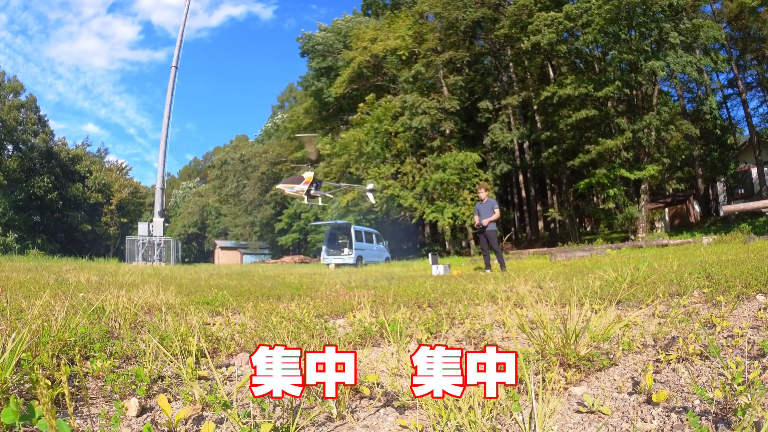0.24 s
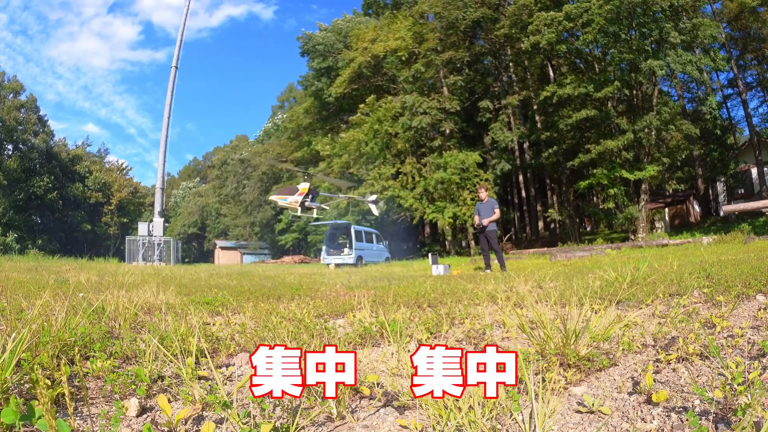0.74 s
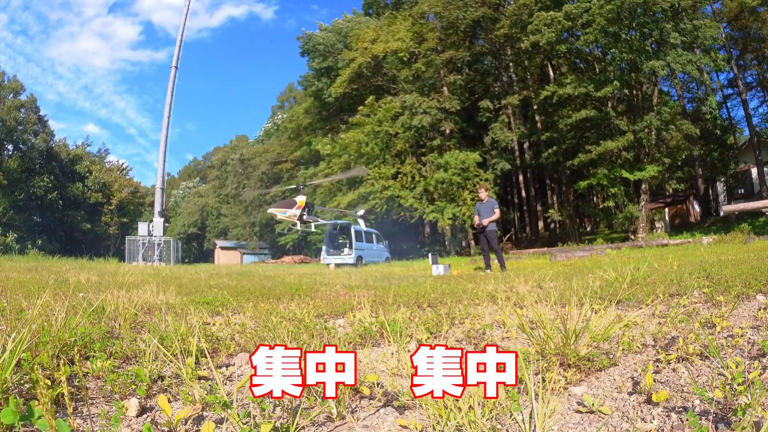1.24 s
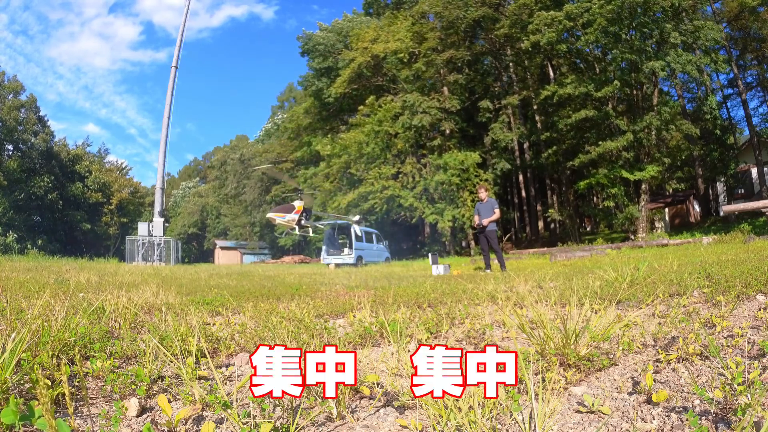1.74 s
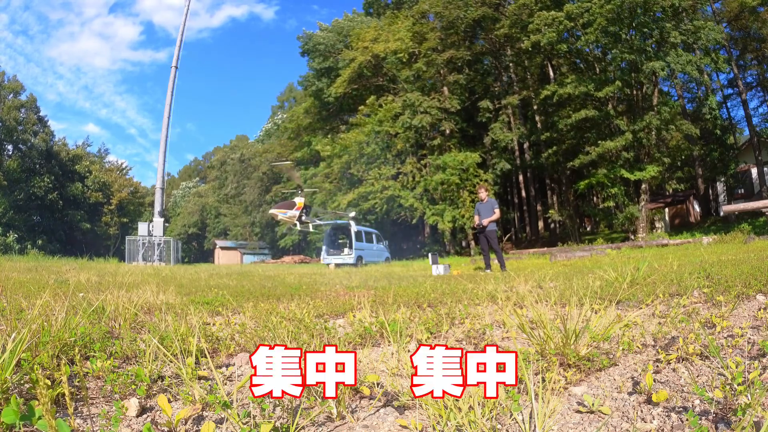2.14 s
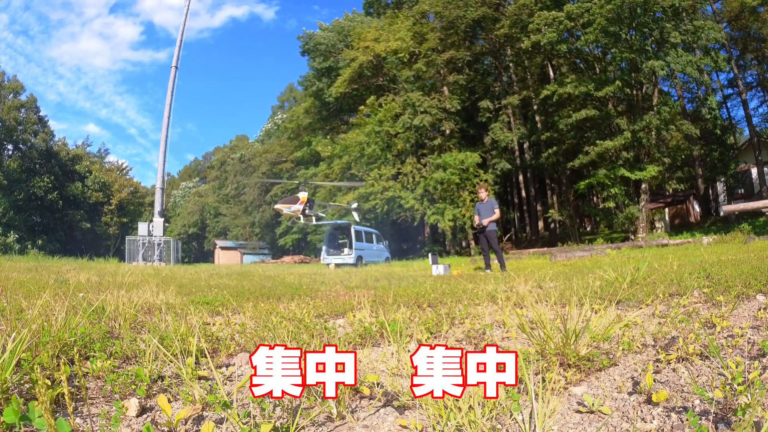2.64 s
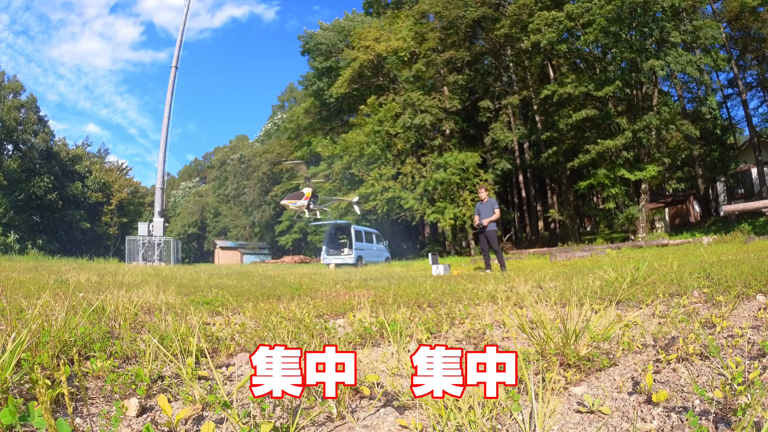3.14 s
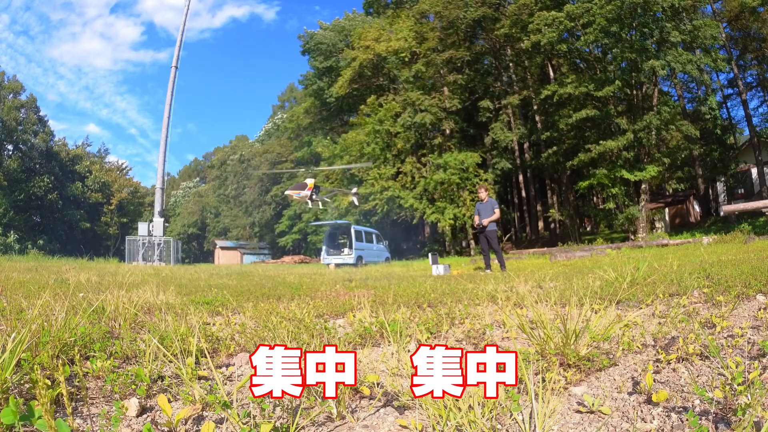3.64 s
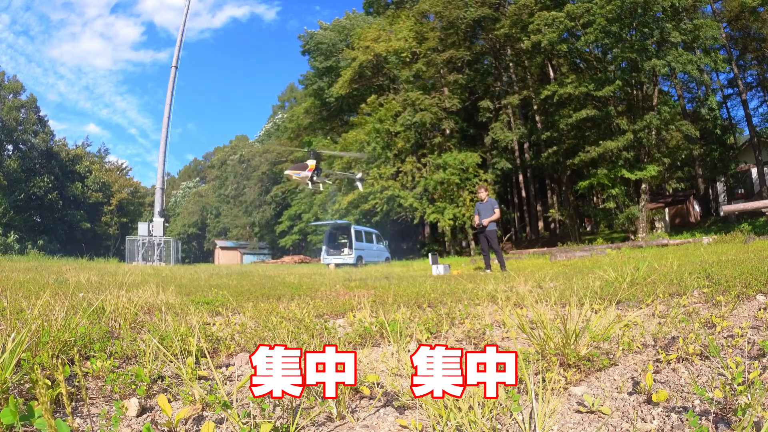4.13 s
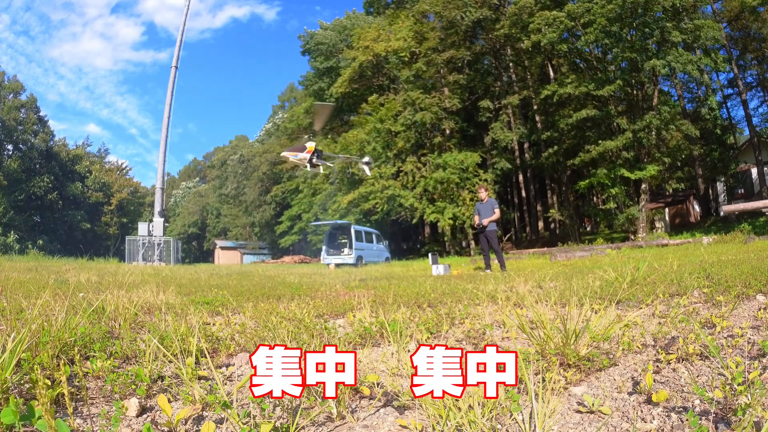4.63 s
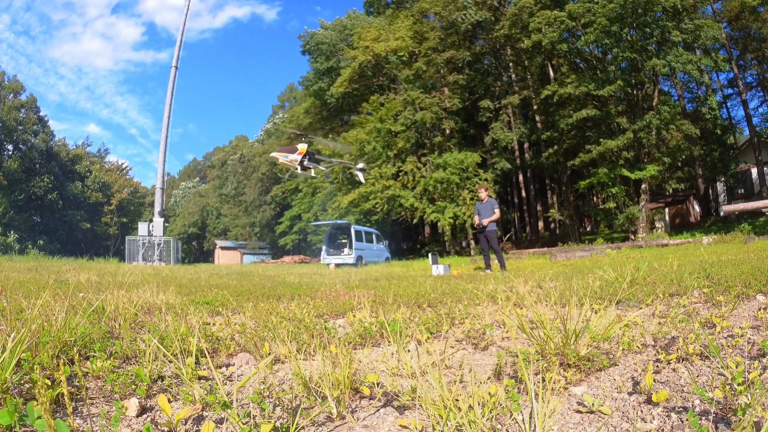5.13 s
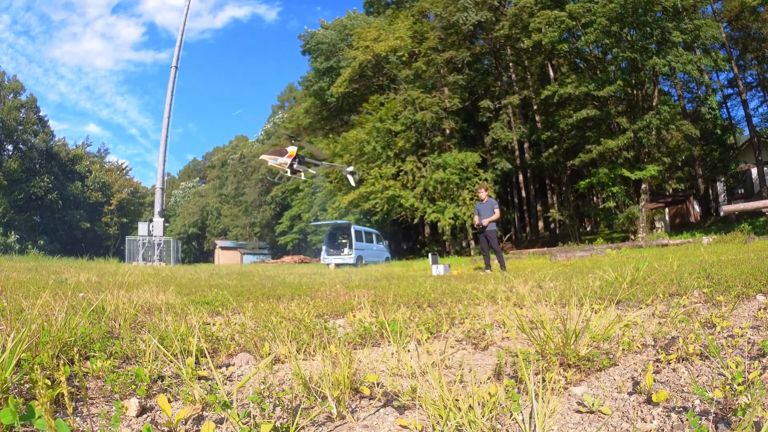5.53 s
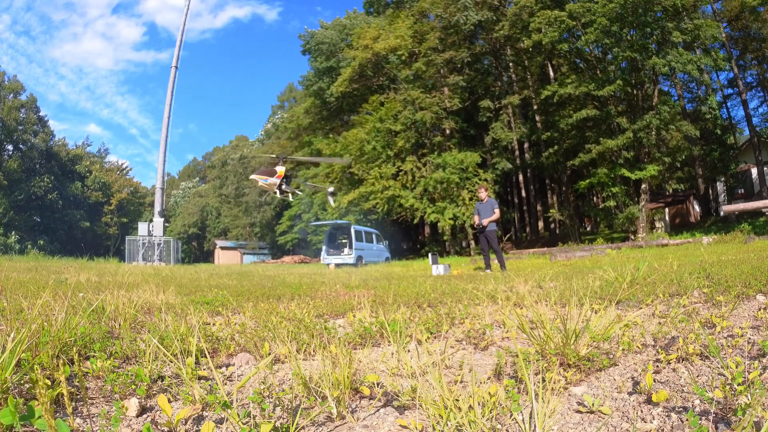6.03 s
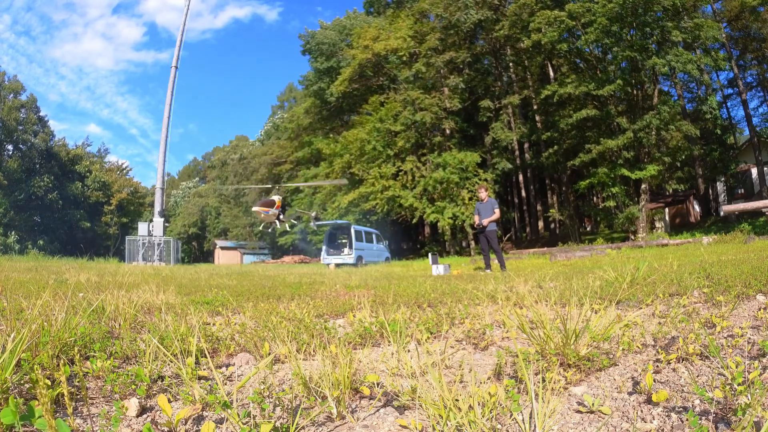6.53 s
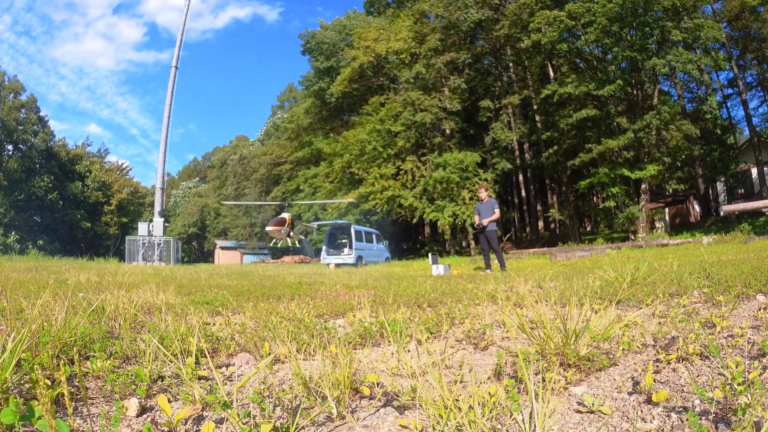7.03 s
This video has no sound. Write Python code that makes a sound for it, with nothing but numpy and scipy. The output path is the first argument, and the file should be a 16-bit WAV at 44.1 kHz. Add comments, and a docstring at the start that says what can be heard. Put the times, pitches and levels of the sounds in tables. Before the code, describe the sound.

From 0 seconds a model helicopter is already hovering over grass, its two-stroke engine droning continuously at around 215 hertz, with the octave above strongest and a raspy, gassy edge. The rotor turns about twenty-two times a second, fluttering the note and adding roar, midrange rush and hiss. Each turn gives a tiny rising whistle near 13 kilohertz, merging into a bright, rapid chirring that swells and fades, stronger around 2.4 and 4 to 6 seconds. Pitch lifts slightly near 1 and 4 seconds. Blade slap appears lightly at 0.8, returns around 5 to 5.5, then crackles in a hard, rapid cluster from 5.97 to 6.24. Afterwards the craft turns away, the whistle thins, the rasp changes colour, and pitch sinks gently until 7.25, still running. Faint low gusts buffet the outdoor stereo microphones, including a brief thump near 5.6; the ground reflection is short and dull.

```python
"""A raspy two-stroke drone hovers over grass, a rotor beating on it: a model helicopter before low microphones.
The single cylinder fires once a turn: a sum of exhaust partials through a tuned muffler, plus puffs of gas.
The geared rotor beats on that note, roars and slaps its wake (shaped noise); one blade edge whistles each turn
(a short rising tone). Grass returns a dull echo, gusts buffet the microphones. Levels are before the microphones."""
import sys
import numpy as np
from scipy import signal
from scipy.fft import rfft, irfft, next_fast_len
from scipy.io import wavfile
from scipy.ndimage import uniform_filter1d

SR = 44100
rng = np.random.default_rng(int(sys.argv[2]) if len(sys.argv) > 2 else 0)


def store_pcm(level_fs):
    """Save levels as 16-bit WAV."""
    pcm = np.round(np.clip(level_fs, -1, 1) * 32767).astype(np.int16)
    wavfile.write(sys.argv[1], SR, np.atleast_2d(pcm).T)


N = 320607
T = np.arange(N) / SR  # s

# engine speed: t/s, f/Hz (turns per second)
ENGINE_SPEED = [(0.0, 213.5), (0.8, 214.51), (1.05, 217.03), (1.4, 216.45), (1.78, 215.32), (2.0, 216.34),
                (2.25, 214.61), (2.7, 214.8), (3.2, 215.28), (3.75, 216.94), (4.3, 217.25), (4.75, 215.36),
                (5.05, 216.01), (5.3, 215.34), (5.7, 216.09), (6.05, 213.84), (6.35, 214.19),
                (6.85, 212.93), (7.27, 208.8)]
GEAR = 9.63  # engine turns per rotor turn
# angle at which the singing blade faces the listener, sliding as the craft turns away: t/s, rotor angle/turns
FACING = [(0, .46), (1.05, .433), (2.1, .46), (3.4, .45), (4.1, .466), (5.5, .449), (6.3, .469),
          (7.27, .55)]
# craft turns away: start t/s, end t/s
TURN_S = (6.3, 7.27)

# low exhaust partials: t/s, level/dB of the first, second, third
DRONE = [(0.05, -28.5, -18.5, -33.5), (1.0, -31, -18, -30), (1.7, -29, -18, -31), (2.5, -28.5, -18, -33.5),
         (3.8, -30.5, -19, -38), (4.4, -30.5, -20, -33.5), (5.0, -29, -19, -31.5),
         (5.75, -28.5, -18.5, -31.5), (6.35, -27.5, -19.5, -36.5), (6.65, -27.5, -18.5, -47),
         (7.02, -28, -18.5, -41.5), (7.22, -28.5, -20.5, -42)]
# blades chopping the exhaust note: exhaust partial, rotor turns added, level/dB re partial
BEATS = [(1, -1, -29), (1, 1, -20), (1, 2, -16), (1, 3, -26), (1, 4, -26), (1, 9, -20), (2, -3, -34),
         (2, -2, -26), (2, -1, -22), (2, 1, -31), (2, 2, -36), (2, 3, -34), (3, -2, -24), (3, 1, -19)]
# upper exhaust partials, one row each: base level/dB, change/dB once turned away, gain/dB per dB of wake slap
UPPER = [(-52.7, 1, 0), (-44.2, -16, .1), (-38.6, -10, 0), (-41, -8, .5), (-39.1, 2, .25), (-46.4, 8, .15),
         (-40.2, -7, 0), (-52, 6, .7), (-50.2, 5, -.2), (-53.4, -6, .2), (-52.3, -2, .3), (-51.8, 0, .5),
         (-41, -4, 0), (-42, 1, .15), (-43.2, -3, .3), (-45.2, 1, .2), (-46.2, 4, 0), (-55.7, -3, 0),
         (-62.6, 8, 0), (-53.6, -1, .3)]
FIRST_UPPER = 4  # multiple of the firing rate in the first row
USUAL_SLAP_DB = -42  # slap level at which the load adds nothing

# hums, probably tail rotor and drive: multiple of rotor speed, waver rate/Hz, level/dB
HUMS = [(11, 2, -45), (20, 4, -45), (22, 4, -50), (33, 4, -53)]
# rotor noise: t/s, roar level/dB, wake slap level/dB
ROTOR = [(0.05, -45.5, -48), (0.4, -43, -54), (0.7, -42.5, -40), (1.3, -44, -46.5), (2.0, -42.5, -45),
         (2.6, -45, -52), (3.2, -45.5, -54), (3.9, -46, -56.5), (4.4, -44.5, -52), (5.0, -44, -38),
         (5.5, -43, -34), (5.76, -44, -45.5), (6.08, -43.5, -38.5), (6.5, -43.5, -43), (7.22, -47, -55)]
RUSH_DB = -2.5  # upper rush re roar, before the ground echo
# hardest wake slaps: onset t/s, level/dB, centre f/Hz
HARD_SLAPS = [(.795, -27, 1500), (5.027, -24, 2160), (5.965, -20, 1720), (6.0104, -20, 2000),
              (6.0537, -25, 2120), (6.125, -26, 1900), (6.1884, -20, 1800), (6.236, -26, 2360)]
# blade edge: t/s, whistle level/dB, whistle f/Hz when facing, hiss level/dB
WHISTLE = [(0.09, -24.5, 13080, -40), (0.7, -26, 12700, -39.5), (0.99, -29.5, 12970, -39),
           (1.25, -25, 12950, -39.5), (1.6, -29.5, 12580, -40), (2.06, -31, 12620, -40.5),
           (2.42, -23.5, 12860, -40.5), (2.8, -28.5, 12600, -42), (3.13, -31.5, 12450, -42),
           (3.6, -29, 12720, -42.5), (3.9, -24, 13100, -40.5), (4.3, -24, 12900, -40.5),
           (4.7, -25, 12350, -40), (5.0, -24.5, 12740, -40), (5.8, -23, 13020, -40),
           (6.16, -26.5, 12480, -41.5), (6.4, -32.5, 12620, -41.5), (7.21, -29.5, 12790, -44.5)]

# gusts at the microphones: t/s, peak level/dB, half length/s
GUSTS = [(.45, -52, 0.07), (.9, -48, 0.16), (1.35, -44.5, .15), (2.605, -44, 0.34), (3.1, -53, .2),
         (4.4, -47, 0.23), (5.497, -43, 0.17), (5.62, -35, 0.03), (6.4, -50, 0.41)]
CALM_DB = -54.

# noise colours: f/Hz, level/dB per Hz
WIND_COLOUR = [(20, -19), (35, -21), (52, -23), (64, -15), (90, 0), (150, -1), (200, -8), (400, -30)]
ROAR_COLOUR = [(90, -25), (170, -4.5), (250, 0.5), (480, -0.5), (750, 1.5), (900, -16), (1300, -53)]
RUSH_COLOUR = [(600, -61), (850, -1.5), (1100, 0), (1600, -2.5), (2800, -3.5), (4400, -5), (5200, -14.5),
               (6500, -28), (16000, -25)]
SLAP_COLOUR = [(700, -56), (1200, -4.5), (1700, 2), (2300, -0.5), (3000, -10.5), (4500, -24)]
HISS_COLOUR = [(4000, -24), (6000, -10), (8800, -6), (10100, -9.5), (10900, 3), (13200, -2), (14500, -2),
               (16300, -20)]
EDGE_RUSH_COLOUR = [(6000, -30), (8800, -13), (10100, -14), (11200, -3), (13200, 0), (14600, -4),
                    (16300, -10)]

# left-right likeness of noise: f/Hz, correlation (0-1)
LIKENESS = [(40, .4), (90, 0.48), (200, 0.97), (500, 0.87), (900, 1), (1400, 0.52), (3100, 0.86),
            (6800, .55), (15000, 0.37)]
# ground echo, longer when the craft is higher: t/s, lag/ms
GROUND_LAG = [(0.0, 0.262), (0.6, 0.266), (1.0, 0.249), (1.4, 0.213), (2.0, 0.183), (2.6, 0.227),
              (3.3, 0.224), (3.9, 0.267), (4.4, 0.319), (4.9, 0.334), (5.5, 0.336), (6.0, 0.311),
              (6.5, 0.237), (7.27, 0.1)]
GRASS_SHARE, GRASS_HZ = .95, 1700.  # echo gain in the bass, treble corner
# microphone balance: f/Hz, left over right/dB
LEAN = [(60, -5.5), (110, -4.5), (200, -1.7), (380, -1.2), (700, 0.0), (1290, -1.5), (2380, -5),
        (4400, -3.0), (8120, -5.5), (15000, -5.0)]
# microphone ports: f/Hz, phase lead of left/rad
LEAD = [(200, .1), (430, .07), (650, .015), (950, 0), (1700, -.3), (2800, .1), (8800, -.1), (13500, .5),
        (16000, 0)]
LOW_CUT_HZ, BAND_LIMIT_HZ = 66., 16050


def amp(db):
    """Decibels to gain."""
    return 10 ** (np.asarray(db) / 20)


def evened(x):
    """Scale to rms 1."""
    return x / np.sqrt(np.mean(x ** 2) + 1e-20)


def columns(rows):
    """Each column of a time table, interpolated per sample."""
    s, *values = np.transpose(rows)
    return [np.interp(T, s, v) for v in values]


def read(points, hz):
    """Spectrum table at the given frequencies, interpolated over log frequency."""
    f, value = np.transpose(points)
    return np.interp(np.log(hz + 1), np.log(f + 1), value)


def drift(rate_hz, count=1):
    """Slow chance: rms-1 noise smoothed down to rate_hz, made at SR/32."""
    steps = rfft(rng.standard_normal((count, 10240)))
    hz = np.fft.rfftfreq(10240, 32 / SR)
    smooth = irfft(steps / (1 + (hz / rate_hz) ** 4))
    at = np.arange(N) / 32
    return np.array([np.interp(at, np.arange(len(v)), evened(v)) for v in smooth])


def noise(colour, band_hz, patchy_db):
    """Stereo noise, random in phase and strength per STFT cell, with drifting patches; about rms 1 in band_hz."""
    frames, hz = N // 256 + 6, np.fft.rfftfreq(1024, 1 / SR)
    a, b, c, d, patches = rng.standard_normal((frames, 513, 5)).T
    patches = uniform_filter1d(patches, size=10, axis=0)
    patches = evened(uniform_filter1d(patches, size=12, axis=1))
    same = np.clip(read(LIKENESS, hz), -1, 1)[:, None]
    left = a + 1j * b
    right = same * left + np.sqrt(1 - same ** 2) * (c + 1j * d)
    cells = np.array([left, right]) * amp(read(colour, hz)[:, None] + patchy_db * patches)
    power = (abs(cells) ** 2).mean((0, 2))
    in_band = (hz > band_hz[0]) & (hz < band_hz[1])
    share = power[in_band].sum() / power.sum()
    sound = signal.istft(cells, nperseg=1024, noverlap=768)[1][:, :N]
    return evened(sound) / np.sqrt(share)


def passing(turns, width_turns):
    """Bell-shaped bump once a turn, and the signed angle from its top in turns."""
    angle = (turns + .5) % 1 - .5
    return np.exp(-.5 * (angle / width_turns) ** 2), angle


def over_grass(x):
    """Direct sound plus a duller ground echo, a fraction of a millisecond later."""
    keep = np.exp(-2 * np.pi * GRASS_HZ / SR)
    dull = signal.lfilter([1 - keep], [1, -keep], x)
    late_s = T - columns(GROUND_LAG)[0] / 1000
    echo = np.array([np.interp(late_s, T, side) for side in dull])
    return x + GRASS_SHARE * echo


def wind():
    """Low buffeting on the microphones: bell-shaped gusts add power to a calm level."""
    gusts = sum(amp(db) ** 2 * np.exp(-((T - s) / half_s) ** 2) for s, db, half_s in GUSTS)
    power = amp(CALM_DB) ** 2 + gusts
    return np.sqrt(power) * noise(WIND_COLOUR, (70, 180), patchy_db=1.2)


def hums(rotor):
    """Narrow bands of noise: multiples of the rotor speed, slowly modulated in quadrature."""
    out = 0
    for multiple, waver_hz, db in HUMS:
        a, b = drift(waver_hz, count=2)
        phase = 2 * np.pi * multiple * rotor
        out = out + amp(db) * (a * np.cos(phase) + b * np.sin(phase))
    return out


def air(rotor):
    """Roar, rush, wake slap and hiss as shaped noise; slap and hiss throb with the two blades."""
    roar_db, slap_db = columns(ROTOR)
    hiss_db = columns(WHISTLE)[2]
    blades = 2 * (rotor - columns(FACING)[0])
    luck = rng.standard_normal((int(blades.max()) + 3, 2))  # per blade pass
    slap_luck = luck[np.floor(blades + .2).astype(int) + 1, 0]
    hiss_luck = luck[np.floor(blades + .5).astype(int) + 1, 1]
    slaps = passing(blades - .3, .16)[0] * amp(2.6 * slap_luck)
    swish = passing(blades, .14)[0] * amp(3.0 * hiss_luck)

    roar = amp(roar_db) * noise(ROAR_COLOUR, (680, 840), patchy_db=2.0)
    rush_db = roar_db + RUSH_DB + .89 * drift(30.)[0]
    rush = amp(rush_db) * noise(RUSH_COLOUR, (890, 1050), patchy_db=1.0)
    slap = amp(slap_db) * noise(SLAP_COLOUR, (1350, 2100), patchy_db=2.5) * evened(1 + .6 * slaps)
    hiss = amp(hiss_db) * noise(HISS_COLOUR, (6000, 16000), patchy_db=1.5) * evened(1 + .45 * swish)
    return roar + over_grass(rush) + slap + hiss


def hard_slaps():
    """A blade cuts squarely through the other's wake: short bursts of band-passed noise."""
    length = 800
    t, out = np.arange(length) / SR, np.zeros(N + length)
    rise_s = .003
    envelope = (t / rise_s) ** 2 * np.exp(2 - 2 * t / rise_s) / 2
    for s, db, hz in HARD_SLAPS:
        band = signal.butter(3, [.78 * hz, 1.28 * hz], "band", fs=SR, output="sos")
        burst = signal.sosfilt(band, rng.standard_normal(length))
        out[round(s * SR):][:length] += amp(db) * evened(burst) * envelope
    return out[:N]


def whistle(rotor):
    """Once a turn a blade edge sings for a few milliseconds, rising as it swings towards the listener."""
    level_db, hz, _ = columns(WHISTLE)
    facing = rotor - columns(FACING)[0]
    turn = np.floor(facing + .5).astype(int) + 1
    luck = rng.standard_normal((turn.max() + 1, 4))[turn].T  # every sweep differs a little
    bump, angle = passing(facing + .005 * luck[0], .038)
    slope_hz_per_turn = 13000. + 3000. * luck[2]
    pitch_hz = hz + 200. * luck[1] + slope_hz_per_turn * np.clip(angle, -.12, .12)
    phase = 2 * np.pi * np.cumsum(pitch_hz) / SR
    a, b = drift(600., count=4).reshape(2, 2, N)  # roughness, per channel
    tone = (1 + .45 * a) * np.cos(phase) + .45 * b * np.sin(phase)
    tone = tone + amp(-14.) * b * np.cos(.73 * phase)  # weaker, lower edge tone
    # the rush of air dies more slowly than the note
    trail = signal.lfilter([.006], [1, -.994], bump)
    rush = noise(EDGE_RUSH_COLOUR, (6000, 16000), patchy_db=2.5)
    rush = amp(-6.5) * rush * (.4 * bump + 1.3 * trail)
    return (tone * bump * amp(luck[3]) + rush) * amp(level_db)


def rasp(firing, rotor):
    """Sharp edge of each exhaust pulse: upper partials rocked by the rotor, unsteady, plus gas puffs."""
    rocking = .0068 * np.sin(2 * np.pi * rotor)
    shaken = firing + rocking + .003 * drift(35.)[0] + .0033 * drift(10.)[0]
    fades, skews = drift(.82, count=2 * len(UPPER)).reshape(2, -1, N)
    turned = np.interp(T, TURN_S, [0, 1])
    strain_db = columns(ROTOR)[1] - USUAL_SLAP_DB  # rotor working harder
    out = 0
    for k, (row, fade, skew) in enumerate(zip(UPPER, fades, skews), FIRST_UPPER):
        db, turned_db, follows = row
        apart = np.outer([1, -1], skew)  # the two microphones catch each partial differently
        # the muffler lets higher partials out later, smearing the pulse
        phase = 2 * np.pi * k * shaken - .17 * k * k + .3 * apart
        level_db = db + turned_db * turned + follows * strain_db + 1.3 * fade + 1.1 * apart
        out = out + amp(level_db) * np.cos(phase)
    edge = np.sqrt(2) * out * amp(1.4 + .6 * drift(90.)[0])
    # gas hisses through the outlet at each firing
    puff_colour = [(2500, -25), (3300, -3), (3700, 0), (4300, -5), (5200, -25)]  # f/Hz, level/dB per Hz
    puffs = noise(puff_colour, (0, SR), patchy_db=1.5)
    puffs = amp(-46.) * puffs * evened(.25 + passing(firing, .68)[0])
    return edge + puffs


def drone(firing, rotor):
    """Three low partials favoured by the muffler, with blade beats as sidebands around them."""
    levels_db = columns(DRONE)
    out = 0
    for k, db in enumerate(levels_db):
        out = out + amp(db) * np.cos(2 * np.pi * (k + 1) * firing + 2.1 * np.sqrt(k))
    for (k, turns, db), wander in zip(BEATS, drift(2.9, count=len(BEATS))):
        phase = 2 * np.pi * (k * firing + turns * rotor + rng.random())
        out = out + amp(levels_db[k - 1] + db + 1.45 * wander) * np.cos(phase)
    return np.sqrt(2) * out


def scene():
    """Engine and rotor turn together through the gear; all layers add."""
    firing = np.cumsum(columns(ENGINE_SPEED)[0]) / SR  # turns
    rotor = firing / GEAR
    background = wind() + hums(rotor)
    blades = air(rotor) + hard_slaps() + whistle(rotor)
    exhaust = drone(firing, rotor) + over_grass(rasp(firing, rotor))
    return background + blades + exhaust


def record(dry):
    """Microphone pair: leans right, ports differ in phase, deep bass cut; then the band limit."""
    size = next_fast_len(N)
    hz = np.fft.rfftfreq(size, 1 / SR)
    half_lean_db = read(LEAN, hz) / 2
    balance = amp([half_lean_db, -half_lean_db])
    ports = np.exp(.5j * np.outer([1, -1], read(LEAD, hz)))
    low_cut = hz ** 2 / np.sqrt(hz ** 4 + LOW_CUT_HZ ** 4)
    leaned = irfft(rfft(dry, size) * balance * ports * low_cut, size)[:, :N]
    band_limit = signal.firwin(511, BAND_LIMIT_HZ, window=("kaiser", 9), fs=SR)
    return signal.oaconvolve(leaned, band_limit[None], "same")


dry = scene()
out = record(dry)
store_pcm(out)
```